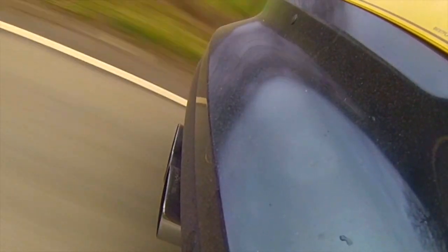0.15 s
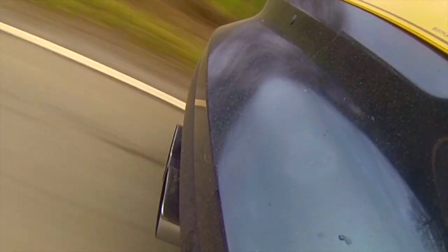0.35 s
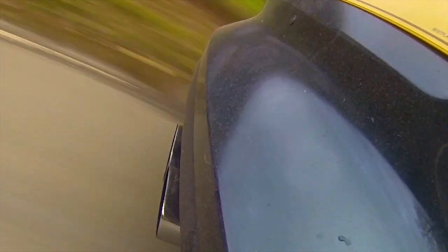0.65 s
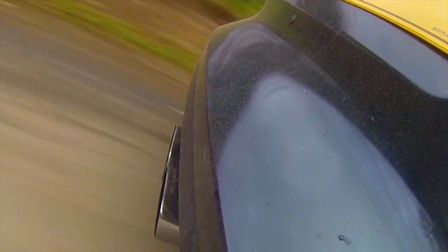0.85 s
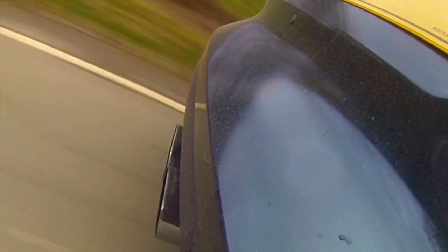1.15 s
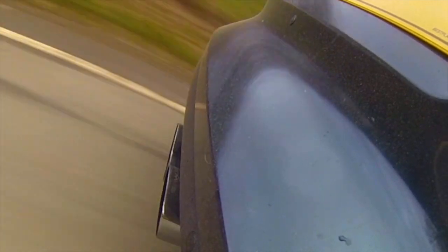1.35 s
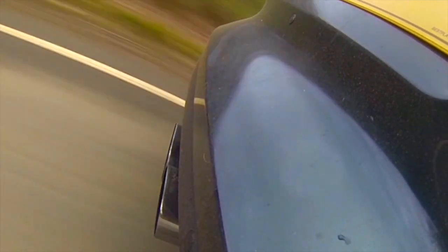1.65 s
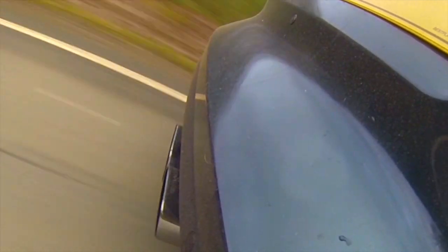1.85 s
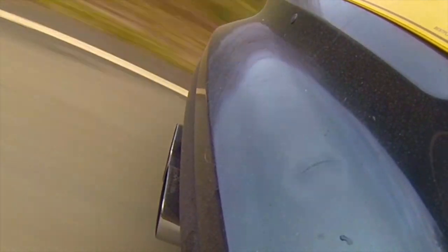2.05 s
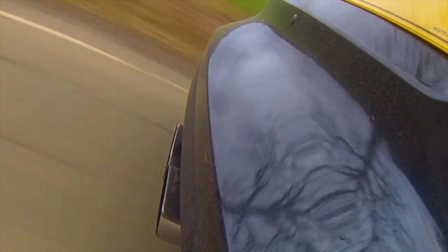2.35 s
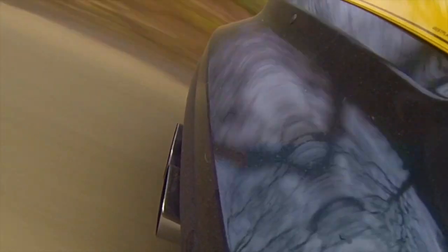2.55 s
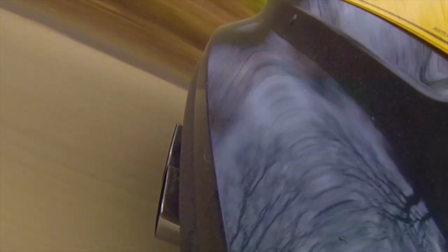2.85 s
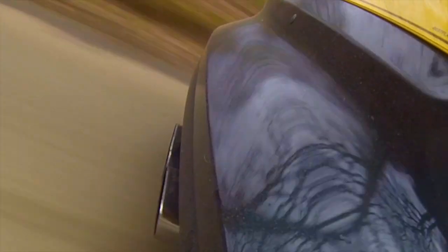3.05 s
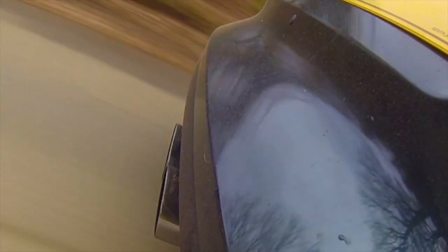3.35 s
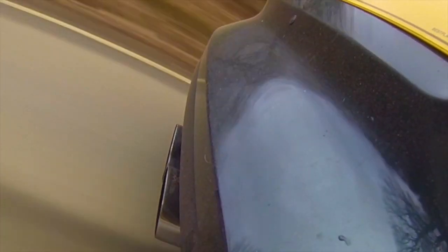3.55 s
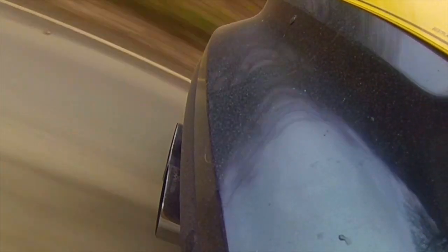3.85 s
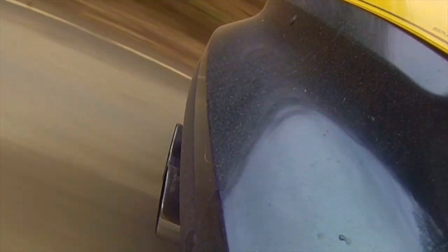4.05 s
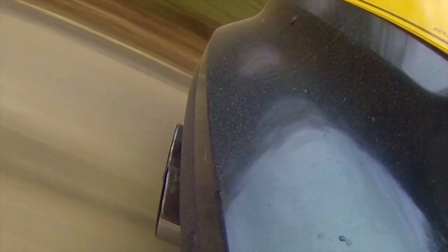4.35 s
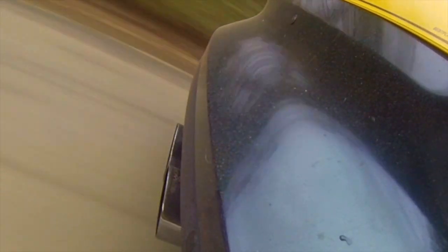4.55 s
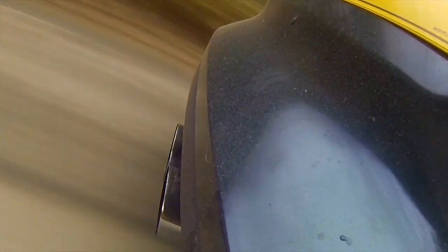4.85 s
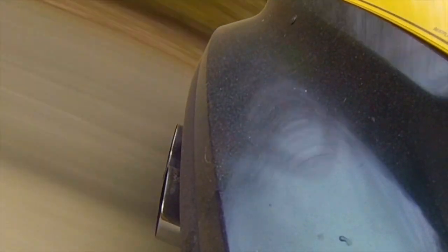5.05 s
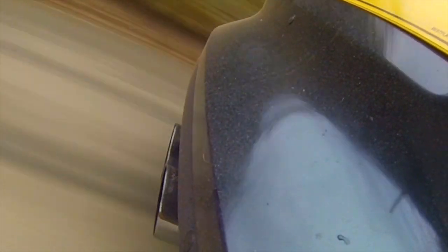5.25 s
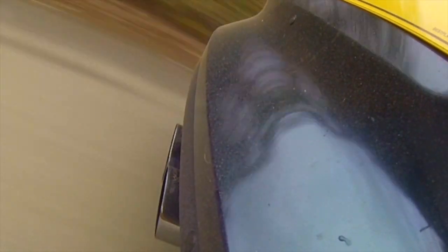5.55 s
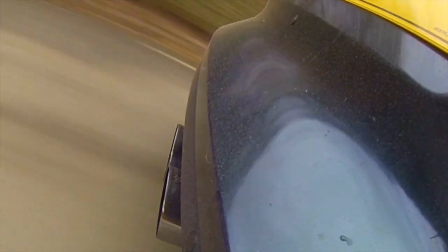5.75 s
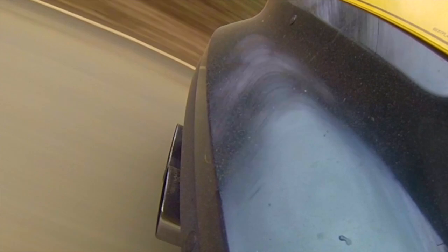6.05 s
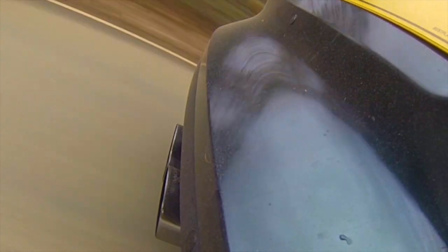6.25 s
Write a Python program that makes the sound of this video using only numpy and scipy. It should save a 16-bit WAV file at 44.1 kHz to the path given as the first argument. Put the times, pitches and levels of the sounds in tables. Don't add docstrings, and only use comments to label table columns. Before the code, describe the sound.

On a moving road car, an outside microphone on the rear flank catches a throaty engine drone with low wind buffeting, heaviest at first. After a short lift the engine loads up and climbs steadily to a hard, buzzing howl. Then the note drops suddenly, and irregular pops and loud bangs spit from the exhaust for almost a second, the sound ducking after each. A softer hum returns at the end.

```python
import sys
import numpy as np
from scipy import signal
from scipy.io import wavfile
from scipy.ndimage import uniform_filter1d

SR = 44100
rng = np.random.default_rng(int(sys.argv[2]) if len(sys.argv) > 2 else 0)


def file_out(sig):
    cols = np.atleast_2d(sig).T
    lim = np.clip(cols, -1, 1)
    pcm = np.round(lim * 32767).astype(np.int16)
    wavfile.write(sys.argv[1], SR, pcm)


def gain_from_db(level_db):
    decades = np.asarray(level_db, float) / 20
    return 10 ** decades


N = 282240

# [t/s, firing rate f/Hz]
SPEED = [(0.0, 202.01), (0.4, 197.28), (0.6, 197.99), (0.8, 196.19), (1.2, 202.09), (1.4, 201.25),
         (1.6, 204.63), (2.0, 210.85), (2.2, 217.75), (2.6, 224.88), (3.0, 234.23), (3.2, 239.99),
         (3.6, 250.49), (4.4, 269.04), (4.8, 274.93), (5.0, 269.88), (5.4, 266.3), (6.4, 261.05)]
# [t/s, throttle 0-1]
THROTTLE = [(0, 0.49), (.54, 0.4), (.58, 0.18), (.96, 0.22), (1.04, 0.38), (1.09, 0.64), (1.14, 0.68),
            (2.0, .76), (2.3, 0.99), (2.45, 0.95), (3.05, .9), (3.25, .98), (3.95, 1.02), (4.7, 0.91),
            (4.86, .88), (4.97, .05), (5.9, .3), (6.4, 0.44)]
OPENING = (0, .2, .33, .45, .7, 1, 1.1)
HUM_DB = (-8, -11.5, 2, 5, 6, -2, -6)
BOOM_DB = (-41, -37.5, -30, -27, -22, -16, -28)
LOPE_DB = (-40, -39.5, -34.5, -28, -34, -33.5, -27)
RING_DB = (-70, -35, -47, -37, -18, -16, -15.5)
RASP_DB = (-69, -58.5, -65, -55, -36.5, -23.5, -28)
SCATTER_DB = (7, 3.5, .6, .7, 1.6, .5, .5)
STEEPNESS = (.2, .2, .2, .2, .3, 1, 1)
LEAN = (.6, .6, .6, .6, .6, .03, .03)
LEAN_DRIFT = .04
# [start t/s, lit t/s, fading t/s, out t/s, share 0-1]
AFTERBURNS = [
    (0.601, 0.633, 0.57, 0.8, 0.75),
    (5.016, 5.079, 5.86, 5.92, 1),
]
# hum, boom, lope, ring, rasp [level/dB]
AFTERBURN_DB = (-1.5, -26, -37, -34.5, -49)
AFTERBURN_SCATTER_DB = 4.5
# [arrival/firings, boom level/dB, ring level/dB, shock level/dB]
CYLINDERS = [(.95, 1.5, 0, 0), (2.2, -1.5, -5, -5), (3.05, -2.5, -1, -4), (4.25, .5, -7, -10),
             (5.1, -3.5, -7, -11), (6.15, 1, -12, -20)]
BANK_DB, BANK_LAG = -4.5, 0.029
# [arrival/firings, level/dB]
LOPE_BEATS = [(0, 0), (1.9, -3), (3.8, -5)]
# [multiple of the cycle rate, level/dB]
ORDERS_DB = [(2, -14.5), (3, -14), (4, -9), (5, -14), (9, -5.5)]
# [f/Hz, hum level/dB, boom level/dB]
BODY = [(200.2, -17, 2.4), (209.3, -29, 0), (219.5, -15.5, 1.5), (224.7, -24, 2.5), (241.7, -37, -2),
        (253.7, -23, -6.5), (272, -25.5, 1), (255, -33.5, -3)]
# [f/Hz, width/Hz, level/dB]
SHELL = [(90.3, 44, -1.5), (114.1, 18.6, 1.5), (184.1, 8.7, -1), (288, 21.7, -3)]
# [f/Hz, width/Hz, level/dB]
DRONE = [(526.4, 30, 0)]
DRONE_DB = -30.5
# [f/Hz, width/Hz, level/dB]
BOOM = [(273.6, 28.3, -4), (402.7, 24.6, 5), (522.5, 100, 1.5), (687.5, 45, 12), (830, 51, 5.5),
        (904, 79, 5), (1080, 170, 2.5), (1065, 69, 4.5)]
RING = [(1376, 69.3, 7), (1497, 155.4, 1.5), (1645, 182, -6), (1954, 19, -13.5), (2237, 98, -7)]
RASP = [(3236, 184, 8), (3990, 670, -6.5), (4920, 240, -6.5), (6196, 180, -7), (6540, 320, -13.5),
        (8010, 770, -14), (11000, 860, -28.5), (12080, 390, -21.5), (14130, 1700, -34)]
# [f/Hz, width/Hz, level/dB]
LOPE = [(263.4, 66, -10.5), (513.5, 57.5, 3.5), (600, 150, 0.5), (719, 60, 4.5), (875, 130, 3),
        (942, 69, 2.5), (1390, 133, 5.5)]
# [t/s, peak level/dB, burn/ms]
BANGS = [(5.0502, -22, 1.1), (5.0717, -24, 2), (5.1118, -20, 2.6), (5.137, -5, 2.4), (5.1423, -12, 1.5),
         (5.2254, -3, 1.7), (5.2618, -12.5, 1.4), (5.2653, 1, 0.98), (5.3122, -18, 3.4),
         (5.3369, -11.5, 3.9), (5.3551, -3.5, 3.8), (5.4006, -19, 2), (5.4244, -8.5, 2.3), (5.433, -10, 2),
         (5.443, -6, 2), (5.5151, -10, 1.5), (5.5184, -3.5, 1.6), (5.533, -10, 1.3), (5.5903, -4.5, 2.8),
         (5.6064, -7.5, 1.5), (5.6087, -3, 3.1), (5.625, -16.5, 2), (5.6804, -5, 2.7), (5.695, -12.5, 5.7),
         (5.7213, -6, 1.6), (5.7362, -7.5, 0.69), (5.7924, -5.5, 3.8), (5.8419, -0.5, 1.4),
         (5.85, -9.5, 2.6), (5.8965, -24.5, 1)]
# [f/Hz, width/Hz, level/dB]
BANG_BOOM = [(388, 210, -10.5), (720, 94, -2), (1080, 48, -15.5)]
# [f/Hz, width/Hz, level/dB]
BANG_RING = [(1397, 72, 6), (1566, 103, -5.5), (2120, 33, -18.5)]
# [middle t/s, length/s, level/dB]
GUSTS = [(.04, 0.3, -17.5), (.19, 0.085, -15), (.47, 0.44, -20.5), (.69, 0.37, -19), (.88, 0.31, -14.5),
         (1.01, .14, -17.5), (1.18, .1, -22), (1.31, .14, -23), (1.72, .4, -27.5), (2.84, 0.076, -25.5),
         (3.14, 0.14, -59), (4.9, 0.13, -34.5), (5.07, 0.4, -28), (5.55, 0.79, -30), (6.29, 0.67, -27)]
# [f/Hz, level/dB per Hz]
WIND = [(14, -59), (32, 12.5), (60, -18.5), (90, -8), (140, -30.5), (200, -15), (300, -33), (450, -38),
        (900, -100)]
CALM_DB, CALM_FALL_DB_PER_S = -26.5, -1.52
# [middle t/s, length/s, level/dB]
JOLTS = [(.03, 0.2, -14), (.35, 0.36, -16), (.6, 0.36, -14.5), (.83, 0.18, -16), (.98, 0.33, -15),
         (1.2, .2, -18.5), (1.5, .5, -21), (1.84, 0.9, -18), (2.55, 0.7, -23.5), (3.07, 0.33, -22.5),
         (3.62, 0.25, -26), (4.07, .2, -23.5), (4.23, 0.14, -25), (4.52, 0.5, -20.5), (5.17, 0.64, -20),
         (5.8, 0.54, -25), (6.36, 0.22, -20.5)]
# [f/Hz, level/dB per Hz]
TYRES = [(88, -33), (150, -8), (208, 0), (468, -62), (687, -13), (1110, -24), (1430, -7), (2450, -48),
         (3270, -32), (5000, -37), (11900, -74), (13100, -63), (15000, -106)]
TYRES_DB = -43
# [f/Hz, width/Hz, level/dB]
HOUSING = [(670, 140, -4), (1443, 79, -3), (2165, 390, 0.8), (3400, 1100, -3), (5110, 92, -3)]
# [t/s, level/dB]
WHINE = [(0, -83), (1, -82), (1.35, -99.5), (6.4, -110)]


def evened(x):
    return x / np.sqrt(np.mean(x ** 2) + 1e-20)


def smoothed(x, size):
    return uniform_filter1d(uniform_filter1d(x, size), size)


def steadied(x, size=6000):
    return x / np.sqrt(smoothed(x ** 2, size) + 1e-12)


def curves(rows):
    s, *columns = np.transpose(rows)
    return [np.interp(np.arange(N) / SR, s, column) for column in columns]


def swells(rows):
    t = np.arange(N) / SR
    power = sum(gain_from_db(2 * db) * np.cos(np.pi * np.clip((t - s) / length, -.5, .5)) ** 2
                for s, length, db in rows)
    return np.sqrt(power)


def clicks(at, gains):
    taps = np.floor(at)[:, None] + np.arange(-7, 9)
    offset = taps - at[:, None]
    shape = np.sinc(offset) * np.cos(offset * np.pi / 16) ** 2
    places = np.clip(taps, 0, N).astype(int)
    return np.bincount(places.ravel(), (shape * gains[:, None]).ravel(), N + 1)[:N]


def through(x, modes, top_hz=15000):
    out = 0
    for k, (hz, width, db) in enumerate(modes):
        peak = signal.iirpeak(min(hz, 20000), hz / width, SR)
        out = out + (-1) ** k * gain_from_db(db) * signal.lfilter(*peak, x)
    return signal.sosfilt(signal.butter(4, top_hz, fs=SR, output="sos"), out)


def puffs(train, ms):
    return signal.lfilter([1], [1, -np.exp(-1000 / (ms * SR))], train) * rng.standard_normal(N)


def shaped_noise(points, patchy_db):
    hz = np.fft.rfftfreq(2048, 1 / SR)
    a, b, patches = rng.standard_normal((N // 512 + 5, 1025, 3)).T
    patches = evened(uniform_filter1d(uniform_filter1d(patches, 9, 0), 5, 1))
    point_hz, point_db = np.transpose(points)
    db = np.interp(np.log(hz + 1), np.log(point_hz + 1), point_db)
    spectrum = (a + 1j * b) * gain_from_db(db[:, None] + patchy_db * patches)
    return evened(signal.istft(spectrum, nperseg=2048, noverlap=1536)[1][:N])


def engine():
    speed_hz, throttle = curves(SPEED)[0], curves(THROTTLE)[0]
    t = np.arange(N) / SR
    burn = sum(np.interp(t, row[:4], (0, row[4], row[4], 0)) for row in AFTERBURNS)

    def at_opening(row, lit):
        return (1 - burn) * np.interp(throttle, OPENING, row) + burn * lit

    layers = (HUM_DB, BOOM_DB, LOPE_DB, RING_DB, RASP_DB)
    flow_db, boom_db, lope_db, ring_db, rasp_db = [
        at_opening(row, lit) for row, lit in zip(layers, AFTERBURN_DB)]
    scatter_db = at_opening(SCATTER_DB, AFTERBURN_SCATTER_DB)
    steepness = np.maximum(np.interp(throttle, OPENING, STEEPNESS), .7 * burn ** 4)
    body_hz, body_hum_db, body_boom_db = np.transpose(BODY)
    hum_db = flow_db + np.interp(speed_hz, body_hz, body_hum_db)
    boom_db = boom_db + np.interp(speed_hz, body_hz, body_boom_db)

    firings = np.cumsum(speed_hz) / SR

    def when(firing):
        return np.interp(firing, firings, np.arange(N), left=N + 9, right=N + 9)

    cycles = np.arange(-1, firings[-1] // 6 + 1)[:, None]
    arrival, boom_row, ring_row, shock_row = np.tile(CYLINDERS, (len(cycles), 1)).T
    far = np.arange(len(arrival)) % 2
    even = when(np.arange(len(far)) - 5 + BANK_LAG * far)
    at = when(np.repeat(6 * cycles, 6) + arrival)
    now = np.minimum(at, N - 1).astype(int)
    luck = np.clip(rng.standard_normal((len(at), 3)), -1.7, 1.7)
    ragged_db = scatter_db[now] * luck[:, 0]

    boom_clicks = clicks(even + 3.1 * ragged_db, gain_from_db(boom_row + BANK_DB * far + ragged_db))
    lean = np.interp(throttle, OPENING, LEAN)[now] + LEAN_DRIFT * evened(smoothed(luck[:, 2], 90))
    ring_at = even + lean * (at - even) + 1.2 * luck[:, 1]
    ring_clicks = clicks(ring_at, gain_from_db(ring_row + ragged_db))
    beat, beat_db = np.transpose(LOPE_BEATS)
    beats_at = when((6 * cycles + beat).ravel())
    lope_clicks = clicks(beats_at, gain_from_db(np.tile(beat_db, len(cycles)) + ragged_db[::2]))

    late = at + 0.8 * luck[:, 1]
    sharp_db = steepness[now] * shock_row
    fronts = clicks(late, gain_from_db(sharp_db + ragged_db + 1.1 * luck[:, 2]))
    steep = clicks(late, gain_from_db(3.0 * sharp_db + 0.7 * luck[:, 2]))
    flutter = gain_from_db(1.1 * np.interp(np.arange(N), even, uniform_filter1d(ragged_db, 3)))

    out = hums(firings, flutter, hum_db, flow_db, steepness)
    out = out + gain_from_db(boom_db) * boom(boom_clicks) + gain_from_db(ring_db) * ring(ring_clicks)
    out = out + gain_from_db(lope_db) * steadied(through(lope_clicks, LOPE, 1670))
    return out - gain_from_db(rasp_db) * rasp(fronts, steep, steepness, rasp_db)


def hums(firings, flutter, hum_db, flow_db, steepness):
    hum = np.sin(2 * np.pi * firings) * flutter
    lows = sum(gain_from_db(db) * np.sin(2 * np.pi * (k * firings / 6 + rng.random())) for k, db in ORDERS_DB)
    drone = through(np.sin(4 * np.pi * firings) * flutter, DRONE)
    out = gain_from_db(hum_db) * hum + gain_from_db(-22.0 + 0.39 * flow_db) * through(lows, SHELL)
    return np.sqrt(2) * (out + gain_from_db(DRONE_DB + flow_db - 10.8 * steepness) * drone)


def boom(pulses):
    pulses = evened(pulses) + 0.11 * evened(puffs(abs(pulses), 6.1))
    return steadied(through(pulses, BOOM, 1560))


def ring(pulses):
    pulses = evened(pulses) + 0.2 * evened(puffs(abs(pulses), 10))
    return steadied(through(pulses, RING[:3], 4000))


def rasp(fronts, steep, steepness, rasp_db):
    fronts = fronts + 0.34 * np.roll(fronts, 100)
    shock = steepness * evened(fronts) + .5 * evened(puffs(abs(fronts), 2.2))
    shock = shock + .07 * rng.standard_normal(N)
    sizzle = 0.15 * evened(steep) + evened(puffs(abs(steep), 3.0)) + .08 * rng.standard_normal(N)
    out = through(shock, RASP[:4], 6100) + gain_from_db(13.5) * through(shock, RING[3:], 4900)
    return steadied(out + gain_from_db(1.45 * (rasp_db + 24)) * through(sizzle, RASP[4:]))


def backfires():
    out, t = np.zeros(N + 4000), np.arange(4000) / SR
    for s, db, ms in BANGS:
        roadside = gain_from_db(-45.5 - 60 * t / 0.63)
        burn = rng.standard_normal(4000) * (0.34 * np.exp(-1000 * t / ms) + roadside)
        blast = (t == 0) + burn
        parts = [(0, through(blast, BANG_RING, 2440)),
                 (-7.5 + .5 * db, through(blast, RASP)),
                 (-7, through(blast, BANG_BOOM, 1150))]
        bang = sum(gain_from_db(part_db) * x / abs(x).max() for part_db, x in parts)
        out[round(s * SR) - 25:][:4000] += gain_from_db(db + 2.0) * bang
    return out[:N]


def wind():
    calm = gain_from_db(CALM_DB + CALM_FALL_DB_PER_S * np.arange(N) / SR)
    lumps = gain_from_db(1.5 * evened(smoothed(rng.standard_normal(N), 900)))
    buffet = np.hypot(swells(GUSTS), calm) * steadied(shaped_noise(WIND, 1.5) * lumps, 3000)
    wander = evened(smoothed(rng.standard_normal(N), 6000))
    wobble_hz = 21.8 + 1.2 * wander
    wobble = np.sqrt(2) * np.sin(2 * np.pi * np.cumsum(wobble_hz) / SR)
    return buffet + swells(JOLTS) * wobble


def road():
    roar = shaped_noise(TYRES, 2.0)
    return gain_from_db(TYRES_DB) * (1.28 * roar + 3.3 * through(roar, HOUSING))


def whine():
    t = np.arange(N) / SR
    throb = 1 + .9 * np.sin(2 * np.pi * 60 * t)
    return gain_from_db(curves(WHINE)[0]) * np.sin(2 * np.pi * 12900 * t) * throb


def scene():
    notch = signal.iirnotch(1165, 6.0, SR)
    exhaust = signal.lfilter(*notch, engine() + backfires())
    return (exhaust + wind() + road() + whine())[None]


def roll_off(x):
    return signal.sosfilt(signal.butter(12, 15570, fs=SR, output="sos"), x)


def record(dry):
    dry = signal.sosfilt(signal.butter(2, 16, "high", fs=SR, output="sos"), dry)
    heard = signal.sosfilt(signal.butter(2, 350, "high", fs=SR, output="sos"), dry[0])
    power_db = 10 * np.log10(abs(uniform_filter1d(heard ** 2, 200)) + 1e-12)
    fall = np.arange(N) * 150.0 / SR
    held_db = np.maximum.accumulate(power_db + fall) - fall
    over_db = np.maximum(held_db + 13.0, 0)
    hiss = gain_from_db(-75.5) * through(rng.standard_normal(N), [(7500, 6000, 0)], 12000)
    ducked = (dry + hiss) / gain_from_db(0.34 * uniform_filter1d(over_db, 130, origin=60))
    size = abs(ducked)
    overloaded = np.sign(ducked) * (.7 + .23 * np.tanh((size - .7) / .23))
    return roll_off(np.where(size < .7, ducked, overloaded))


dry = scene()
out = record(dry)
file_out(out)
```